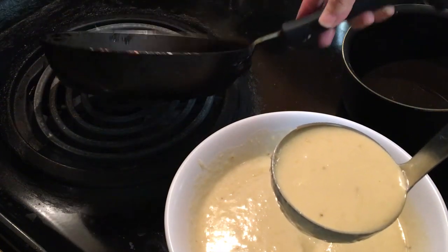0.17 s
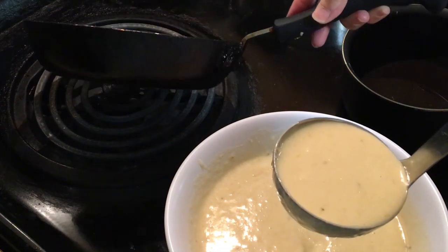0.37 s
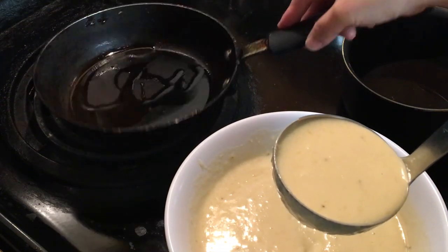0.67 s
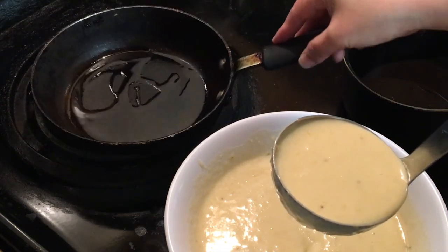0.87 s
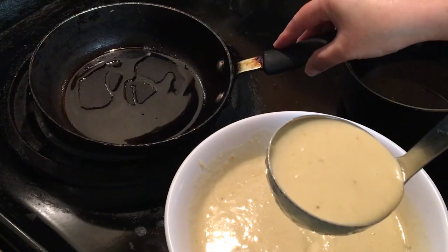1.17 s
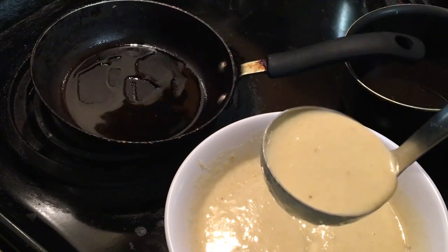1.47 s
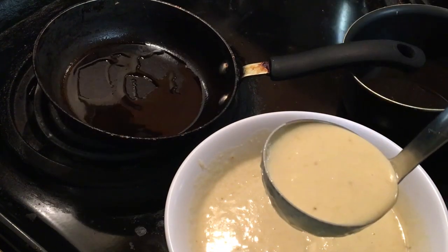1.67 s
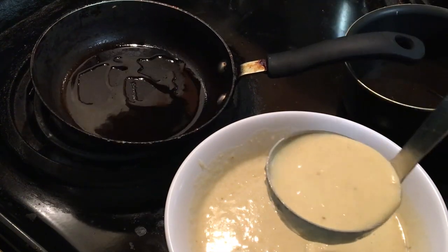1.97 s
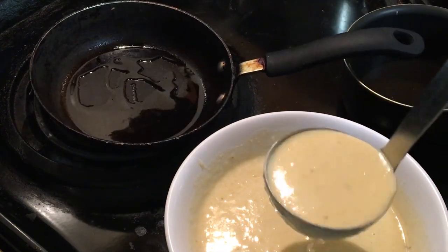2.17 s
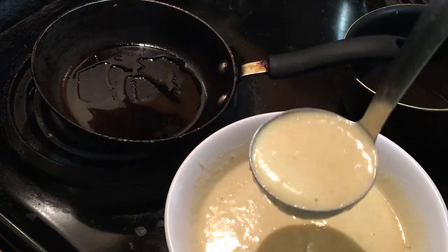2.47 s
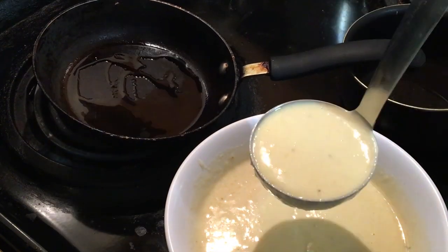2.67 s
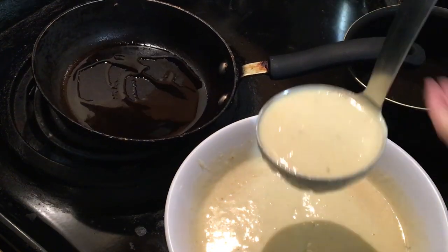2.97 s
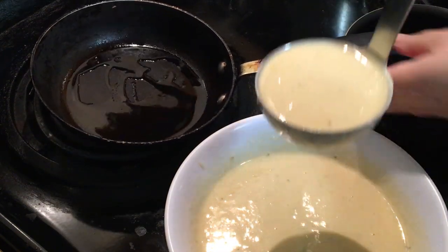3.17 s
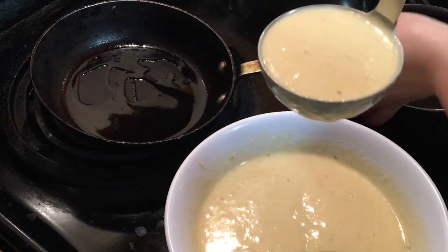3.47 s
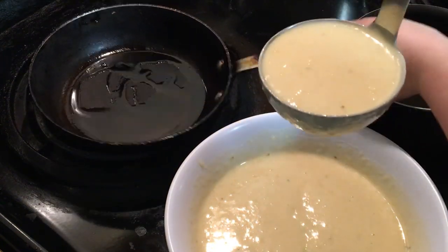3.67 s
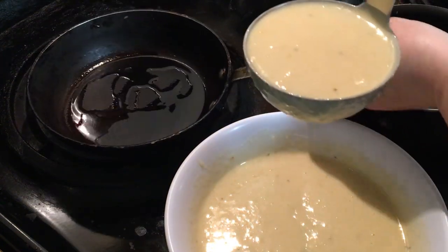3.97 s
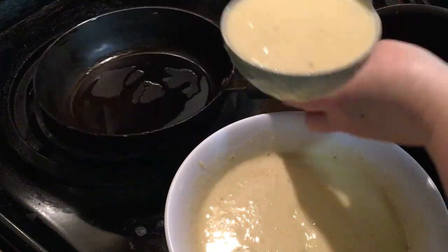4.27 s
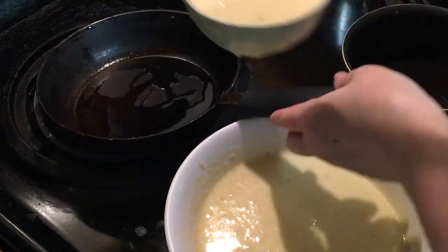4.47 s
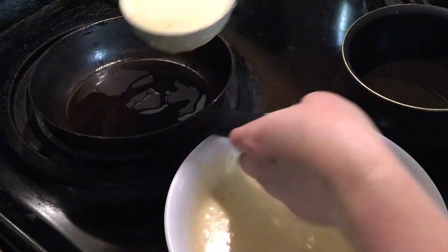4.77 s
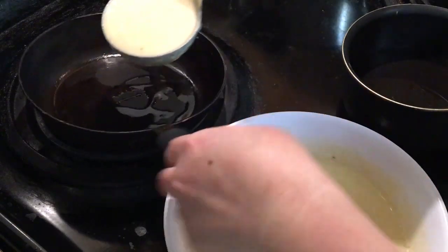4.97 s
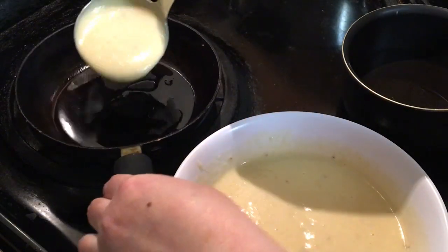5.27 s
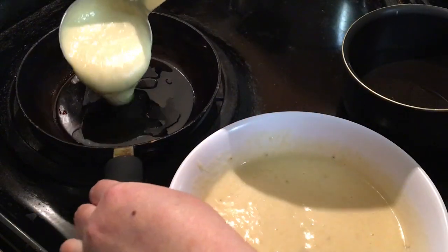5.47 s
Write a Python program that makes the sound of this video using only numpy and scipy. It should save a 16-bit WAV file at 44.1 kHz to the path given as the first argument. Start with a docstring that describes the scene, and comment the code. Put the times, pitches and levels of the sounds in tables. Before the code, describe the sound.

Close metal clanks and gritty scrapes as a steel pan is set down and shifted on a stove, with a steady hum behind.

```python
"""A steel frying pan is set down, nudged and slid on the coil of an electric stove, close to a phone.
Each knock is a blow and a burst of tiny bounces that ring the pan and the thin drip tray; sliding
drives both with gritty friction. The loose coil ticks faintly on its support and a sleeve rustles.
Behind them a small kitchen hums, and its walls return a short tail to the microphone."""
import sys
import numpy as np
from scipy import signal
from scipy.fft import rfft, irfft, next_fast_len
from scipy.io import wavfile
from scipy.ndimage import uniform_filter1d, map_coordinates

SR = 44100
rng = np.random.default_rng(int(sys.argv[2]) if len(sys.argv) > 2 else 0)


def dump(signal):
    """Clip the signal to [-1, 1] and save it as 16-bit WAV at the path in sys.argv[1]."""
    limited = np.clip(np.atleast_2d(signal).T, -1, 1)
    pcm = np.round(limited * 32767).astype(np.int16)
    wavfile.write(sys.argv[1], SR, pcm)


N = 246959

# The pan's clear modes. Each row: pitch in Hz, width in Hz, relative level in dB.
PAN_MODES = [(260, 35, -6), (293, 30, -7), (584, 22, -5), (707, 25, -5), (952, 28, 0), (1030, 30, -2),
             (1092, 28, 0), (1172, 30, -3), (1318, 30, -6), (1421, 25, -8), (1557, 25, -6), (1690, 30, -8),
             (2004, 15, 0), (2270, 30, -12), (2405, 30, -9), (2700, 30, -11), (2908, 30, -9),
             (3135, 15, -3), (3180, 45, -7), (3540, 30, -14), (3815, 40, -13), (4120, 35, -14),
             (4305, 35, -14), (4655, 35, -9), (4905, 45, -12), (5190, 45, -10), (5480, 40, -14),
             (6075, 30, -12), (6368, 28, -11), (7030, 45, -14)]
# The drip tray under the coil. Each row: pitch in Hz, width in Hz, relative level in dB.
TRAY_MODES = [(3140, 27, 0), (3360, 18, -12), (3600, 48, -12), (3810, 48, -10), (4120, 87, -11),
              (4610, 53, -4), (4910, 32, -8), (5290, 35, -8), (5670, 33, -17), (5850, 84, -16),
              (6370, 79, -11), (6990, 69, -13), (7210, 27, -19), (7520, 52, -16), (8350, 53, -11),
              (8770, 36, -15), (8940, 87, -16), (10200, 74, -21), (10400, 42, -21), (11900, 60, -19),
              (12700, 120, -24), (13500, 47, -24)]
# Modes too dense to count. Each row: frequency in Hz, relative level in dB.
CLATTER_SPECTRUM = [(59, -15), (100, -4), (272, -6.5), (383, -10), (709, -12), (756, -7), (1060, -4.5),
                    (1730, -11.5), (2010, -9), (2550, -15), (3150, -13.5), (3360, -17.5), (5250, -14.5),
                    (9740, -20), (16200, -37.5)]
# How that clatter dies. Each row: frequency in Hz, seconds to fall 60 dB.
CLATTER_DECAY = [(150, 0.26), (1000, 0.14), (4000, 0.13), (14000, 0.058)]
# The pan meets the coil, close to the microphone. Each row: start in seconds, peak in dB, bass lift
# in dB, treble lift in dB, chatter length in seconds, clanging pitch in Hz, its boost in dB.
PAN_KNOCKS = [(0.2001, -22.5, 6.5, -5, 0.019, 5190, 10), (0.8092, -11, 3, -1, 0.022, 3170, 9.5),
              (0.8794, -24, 10, -9, 0.013, 1092, 6), (0.927, -22, 0, -7.5, 0.019, 1092, 2),
              (0.987, -28.5, 8.5, -4.5, 0.049, 1092, 6), (1.002, -28, 7.5, -4, 0.02, 952, -7),
              (1.0397, -21.5, -4, 0.5, 0.016, 2004, 8.5), (1.093, -37, 3, -5, 0.027, 5480, 15),
              (3.6661, -24, -6, -16, 0.065, 1172, 23), (3.6736, -22, -5, 1, 0.046, 4655, 12.5),
              (3.6903, -28, 7, 6, 0.044, 2004, 11), (3.723, -12, 2, -4, 0.053, 952, 7),
              (3.752, -16, 2, -1.5, 0.048, 2004, 9.5), (3.7775, -25, 8, 2.5, 0.015, 2004, 8),
              (3.972, -41.5, -5, -3, .056, 1092, -3), (3.993, -35.5, -12, -2, 0.026, 1092, 8),
              (4.273, -28.5, 0, -4, .021, 3815, 16), (4.288, -28, 5, -8, 0.05, 707, 17),
              (4.3303, -29.5, 6, 3.5, 0.027, 2908, 17), (4.359, -31, 12, -8, .036, 1092, 11),
              (4.4065, -34.5, 7.5, -3.5, 0.063, 3815, 12), (4.949, -36.5, 9, 3.5, 0.016, 2004, 22),
              (5.048, -32.5, 12, -11, .02, 1092, 18), (5.1015, -10.5, -1, 3.5, 0.011, 1557, 8),
              (5.1375, -21, -1, -0.5, .032, 3135, 10.5), (5.1446, -16.5, -1, -2, 0.054, 1030, 11),
              (5.168, -22.5, -15, -1, .053, 5190, 12), (5.284, -13.5, -2, 1, 0.08, 3150, 15),
              (5.353, -20, -2, -0.5, 0.045, 6368, 10), (5.37, -25, -8, -3, 0.011, 1092, -11)]


def pan_knocks():
    """Each knock rings the pan's clear modes and the tray over a clatter of dense modes."""
    out, size = np.zeros(N + SR), SR // 3
    for start, db, bass_db, treble_db, length, clang_hz, boost_db in PAN_KNOCKS:
        blow_db = -4 + 0.16 * (db + 24.5)  # harder knocks start sharper
        force = chatter(length, blow_db, size)
        sharp_force = chatter(length, blow_db + 6, size)  # clear modes answer mostly to the first blow
        pan_response = resonances(PAN_MODES, scatter_db=1.5, clang_hz=clang_hz, boost_db=boost_db)
        pan = unit(filtered(sharp_force, pan_response))
        tray = unit(filtered(force, resonances(TRAY_MODES, scatter_db=4)))
        dense_ring = dying_noise(CLATTER_DECAY, CLATTER_SPECTRUM, size)
        clatter = unit(signal.fftconvolve(force, dense_ring)[:size])
        knock = amp(-1) * pan + amp(-18.5) * tray + clatter
        add(out, start, contact_tone(knock, bass_db, treble_db), db)
    return out[:N]


def chatter(length, blow_db, size):
    """Force of a contact: one sharp blow, then micro-bounces that fade 60 dB in length seconds."""
    t = np.arange(size) / SR
    envelope = (1 - np.exp(-t / 0.00079)) * amp(-60 * t / length)
    force = envelope * rng.standard_normal(size) ** 3
    force[8] = amp(blow_db) * np.linalg.norm(force)
    return force


def contact_tone(knock, bass_db, treble_db):
    """Soft contacts lift the bass, hard ones the treble."""
    body_db = 0.84 * bass_db
    lifts = [(300, bass_db), (420, body_db), (750, body_db), (950, 0), (3300, 0), (5500, treble_db)]
    return coloured(knock, lifts)


def resonances(modes, scatter_db=0, clang_hz=1000, boost_db=0):
    """Response of metal modes; the place of contact scatters their strengths and may favour one pitch."""
    hz, width, db = np.transpose(modes)[..., None]
    favoured = np.exp(-(np.log(hz / clang_hz) / 0.015) ** 2)  # about 1.5 % either side
    db = db + scatter_db * rng.standard_normal(db.shape) + boost_db * favoured
    gain = (-1) ** np.arange(len(modes))[:, None] * amp(db)
    return lambda f: np.sum(gain * 1j * f * width / (hz * hz - f * f + 1j * f * width), axis=0)


# Steel rubbing on the rough coil. Each row: frequency in Hz, relative level in dB.
GRIT_SPECTRUM = [(88, -33), (150, -2.5), (250, 0), (416, -5), (692, -6), (748, -6), (3130, -17.5),
                 (3320, -22), (5110, -20), (12100, -33), (16200, -46.5)]
# The pan slides, just as close; one list a stroke. Each row: time in seconds, level in dB,
# brightness in dB, ring over the grit in dB.
SLIDE_STROKES = [
    [(0.84, -47, -23, -7), (0.92, -48.5, -15, 0), (1.02, -54.5, -21, -9), (1.06, -41, -11, -7),
     (1.2, -82, -8, -6)],
    [(3.8, -52, -2, -4), (3.96, -64, -8.5, -6), (4.0, -57.5, -11, -7), (4.11, -56, -10, -7),
     (4.18, -47.5, -6.5, -2), (4.24, -45.5, -8, -3), (4.3, -46.5, -12.5, -9), (4.4, -56, -9, -19),
     (4.5, -61.5, -9, -6)],
    [(4.56, -70, -7, 2.5), (4.61, -61.5, -11.5, -2.5), (4.7, -68.5, -7.5, -0.5), (4.77, -79, -10, 2),
     (4.88, -72.5, -5, 4), (4.93, -62.5, -5, 0.5), (5.02, -60, -9, 0.5), (5.1, -49, -17, -3)],
    [(5.4, -61, -3, -6), (5.47, -66.5, -3, -6), (5.6, -74, -7, -1)],
]


def pan_slides():
    """Gritty friction drives pan and tray: a grinding bass, a ringing middle and a fizzing top."""
    force = rng.standard_normal(N)
    force = amp(2 * wobble(45)) * np.sign(force) * abs(force) ** 1.4  # sharpened into grains
    high = lambda f: 1 / (1 + (3800 / (f + 1)) ** 4)
    bass = lambda f: 1 / (1 + (f / 800) ** 4) / (1 + (180 / (f + 1)) ** 4)
    middle = lambda f: (1 - high(f)) / (1 + (800 / (f + 1)) ** 4)
    grit = coloured(force, GRIT_SPECTRUM)
    pan = filtered(force, resonances(PAN_MODES))
    tray = unit(filtered(force, resonances(TRAY_MODES)))
    grind = unit(unit(filtered(grit, bass)) + 0.42 * unit(filtered(pan, bass)))
    ring = unit(filtered(pan, middle))
    body = unit(filtered(grit, middle))
    fizz = unit(filtered(grit, high))
    out = np.zeros(N)
    for stroke in SLIDE_STROKES:
        db, bright_db, ring_db = curves(stroke)
        treble = amp(bright_db) * (fizz + amp(ring_db + 4) * tray)  # the tray rings more freely
        grind_db = -53.5 + 0.53 * (db + 55)  # the bass grows more slowly than the rest
        sliding = db > -120
        out += amp(db) * (body + amp(ring_db) * ring + treble) + sliding * amp(grind_db) * grind
    return out


# The coil's thin, high modes. Each row: pitch in Hz, width in Hz, relative level in dB.
COIL_MODES = [(3200, 16, 3), (3560, 30, -12), (4110, 35, -10), (4270, 50, -11), (4630, 20, -1),
              (5190, 22, 0), (5290, 40, -6), (5670, 30, -4), (6010, 25, -11), (6470, 40, -7),
              (6740, 22, -2), (7010, 40, -7), (7500, 50, -13), (7840, 28, -12), (8190, 50, -14),
              (9050, 50, -12), (9530, 30, -10), (9880, 28, -11), (10900, 80, -19), (11700, 90, -16),
              (13100, 35, -12), (14000, 25, -16)]
# One dry click before the first knock: start in seconds, peak in dB, length in seconds,
# ring over hiss in dB.
DRY_CLICK = (.1578, -41, .004, -22)
# The coil shivers on its support, faint even from close by. Each row: start in seconds, peak in dB.
COIL_TICKS = [(2.498, -64), (2.949, -51.5), (2.9915, -46.5), (3.056, -48), (3.1305, -47), (3.1484, -49),
              (3.172, -46), (3.217, -46), (3.262, -49), (3.308, -48.5), (3.357, -49.5), (3.436, -51),
              (3.5623, -46.5), (3.612, -48), (4.579, -56), (4.691, -54), (4.833, -54), (5.053, -42)]


def coil_ticks(shiver_s=0.024, shiver_ring_db=2.5):
    """Brief rubs with a sudden start excite the coil's modes and a broad hiss."""
    out, size = np.zeros(N + SR), SR // 4
    t = np.arange(size) / SR
    hiss_spectrum = [(500, -16), (1300, 9), (2500, -4), (5000, -6.5),
                     (9500, -3.5), (11000, -21), (15000, -14)]  # Hz, dB
    shivers = [(start, db, shiver_s, shiver_ring_db) for start, db in COIL_TICKS]
    for start, db, length, ring_db in [DRY_CLICK, *shivers]:
        force = np.exp(-(t / length) ** 4) * rng.standard_normal(size)
        force[0] = 0.56 * np.linalg.norm(force)  # the first touch
        hiss = unit(coloured(force, hiss_spectrum))
        ring = unit(filtered(force, resonances(COIL_MODES, scatter_db=1.5)))
        add(out, start, amp(ring_db) * ring + hiss, db)
    return out[:N]


# Cloth on cloth. Each row: frequency in Hz, relative level in dB.
CLOTH_SPECTRUM = [(590, -21), (1000, 0.5), (1690, -6.5), (2060, -5.5), (2820, -5), (8550, -10),
                  (15000, -22), (16200, -20)]
# A sleeve moves by the stove. Each row: time in seconds, level in dB.
SLEEVE_LEVELS = [(2.3, -100), (2.53, -68), (3.1, -64.5), (3.4, -69), (3.66, -75)]


def sleeve():
    """Cloth rubs in a soft, uneven rustle while the arm lifts."""
    return amp(curves(SLEEVE_LEVELS)[0] + 1.5 * wobble(8.9)) * noise(CLOTH_SPECTRUM)


# Appliance hum in the background. Each row: pitch in Hz, level in dB.
MAINS_TONES = [(120, -60.5), (180, -57.5), (720, -71.5)]
# The room's low rumble. Each row: frequency in Hz, relative level in dB.
RUMBLE_SPECTRUM = [(15, -45), (25, -21), (38, -9), (59, -1), (75, 0), (86, -1), (103, -9), (130, -11),
                   (138, -15), (146, -28), (160, -13), (210, -43), (350, -120)]
# The rumble swells and sinks. Each row: time in seconds, level in dB.
RUMBLE_SWELLS = [(0, -45.5), (.4, -42), (.8, -47), (1.14, -42.5), (1.5, -49.5), (1.87, -41.5), (2.4, -47.5),
                 (3.06, -46), (3.3, -48.5), (3.8, -44.5), (4.3, -49), (5.0, -46), (5.45, -43), (5.6, -52.5)]
# The room's steady drone. Each row: frequency in Hz, relative level in dB.
DRONE_SPECTRUM = [(65, -24), (110, 0), (147, -12.5), (178, -2.5), (243, -13.5), (313, -12.5), (419, -19),
                  (446, -19), (495, -20.5), (721, -21), (768, -25), (1850, -32), (2930, -41),
                  (13700, -51.5), (16200, -59.5)]


def kitchen_hum():
    """Room tone behind the stove: slightly unsteady mains tones, a low rumble and a broad drone."""
    t = np.arange(N) / SR
    tones = np.zeros(N)
    for hz, db in MAINS_TONES:
        level = amp(db + 2.1 * wobble(5.2))
        tones += level * np.sin(2 * np.pi * hz * t + 1.3 * wobble(3.22))
    rumble = amp(curves(RUMBLE_SWELLS)[0]) * noise(RUMBLE_SPECTRUM)
    drone = amp(-52.5) * noise(DRONE_SPECTRUM)
    return rumble + drone + tones


# The small kitchen around the microphone. Each row: frequency in Hz, seconds to fall 60 dB.
KITCHEN_DECAY = [(200, 0.29), (1500, 0.44), (5000, 0.36), (14000, 0.16)]


def kitchen_walls(x, delay_samples=260):
    """The walls answer about 6 ms late; each quarter second gets its own diffuse tail."""
    out, step = np.zeros(N + 2 * SR), SR // 4
    for k in range(0, N, step):
        tail = dying_noise(KITCHEN_DECAY, spectrum=[(100, -2.2), (12000, 1.7)], size=SR // 2)
        wet = signal.fftconvolve(x[k:k + step], tail)
        out[k + delay_samples:][:len(wet)] += wet
    return out[:N]


def amp(db):
    """Gain of a level in dB."""
    return 10 ** (np.asarray(db) / 20)


def unit(x):
    """x at rms 1."""
    return x / np.sqrt(np.mean(x ** 2) + 1e-20)


def along(points, hz):
    """(Hz, value) points read on a log axis."""
    f, values = np.transpose(points)
    return np.interp(np.log(hz + 1), np.log(f + 1), values)


def curves(rows):
    """One value per sample for each dB column; -120 dB outside the rows' times."""
    times, *columns = np.transpose(rows)
    return [np.interp(np.arange(N) / SR, times, column, -120, -120) for column in columns]


def wobble(rate):
    """A smooth random curve, rate knots a second."""
    knots = rng.standard_normal(int(N * rate / SR) + 4)
    return map_coordinates(knots, [np.arange(N) * rate / SR])


def filtered(x, response):
    """x through a complex response of frequency."""
    size = next_fast_len(len(x) + 8192)
    return irfft(rfft(x, size) * response(np.fft.rfftfreq(size, 1 / SR)), size)[:len(x)]


def coloured(x, spectrum):
    """x shaped by (Hz, dB) points."""
    return filtered(x, lambda hz: amp(along(spectrum, hz)))


def noise(spectrum):
    """Coloured noise of rms 1."""
    return unit(coloured(rng.standard_normal(N), spectrum))


def dying_noise(t60, spectrum, size):
    """Noise of energy 1 whose frequencies each die at their own speed."""
    hz, t, bins = signal.stft(rng.standard_normal(size), SR, nperseg=128)
    db = along(spectrum, hz)[:, None] - 60 * t / along(t60, hz)[:, None]
    tail = signal.istft(bins * amp(db), SR, nperseg=128)[1][:size]
    return tail / np.linalg.norm(tail)


def add(track, start, sound, db):
    """Place sound at start seconds; db is its peak, taken as root five times the loudest 4 ms rms."""
    peak = np.sqrt(5 * uniform_filter1d(sound ** 2, size=176).max())
    track[round(start * SR):][:len(sound)] += amp(db) * sound / peak


def scene():
    """The stove close up, with the walls' answer, the sleeve and the hum underneath; mono."""
    stove = pan_knocks() + coil_ticks() + pan_slides()
    return (stove + amp(-12) * kitchen_walls(stove) + sleeve() + kitchen_hum())[None]


def record(dry):
    """The phone by the stove drops the deepest bass and keeps nothing above its band limit."""
    bottom_hz, top_hz = 27, 16050
    thinned = filtered(dry[0], lambda hz: 1 / (1 + (bottom_hz / (hz + 1)) ** 6))
    return filtered(thinned, lambda hz: 1 / (1 + (hz / top_hz) ** 150))[None]


dry = scene()
out = record(dry)
dump(out)
```